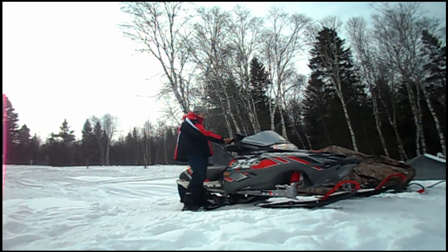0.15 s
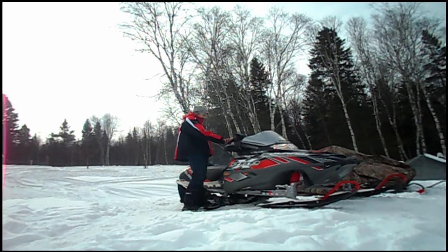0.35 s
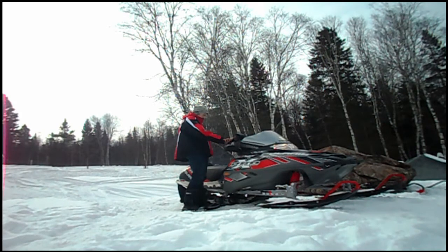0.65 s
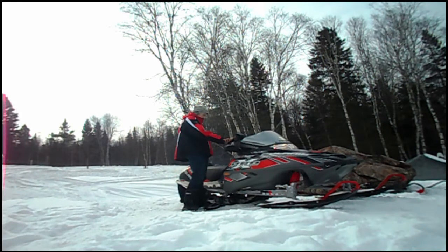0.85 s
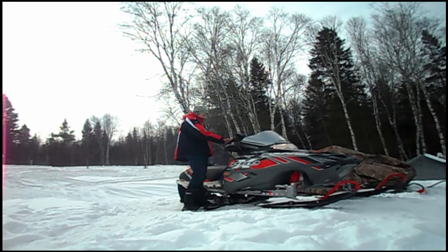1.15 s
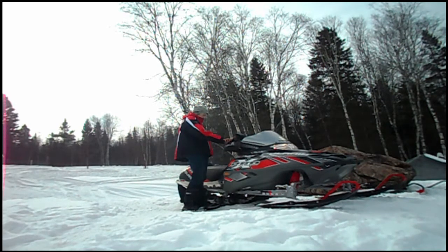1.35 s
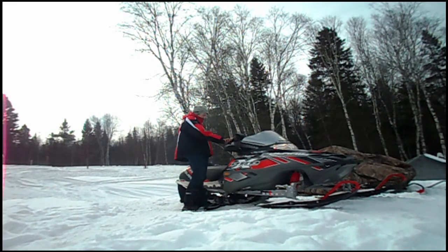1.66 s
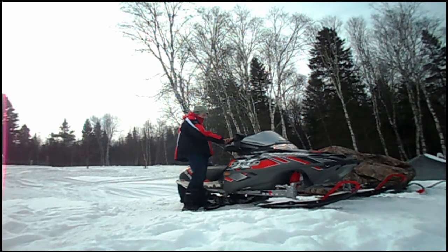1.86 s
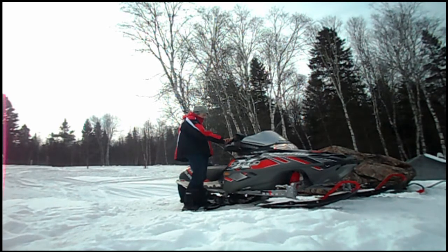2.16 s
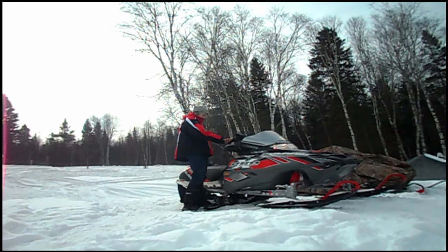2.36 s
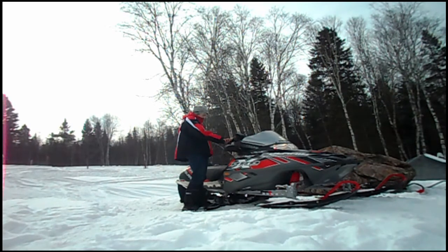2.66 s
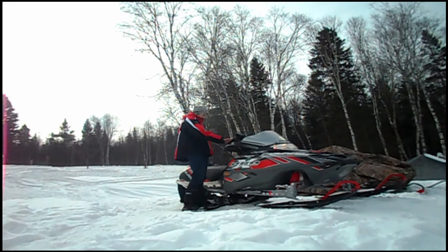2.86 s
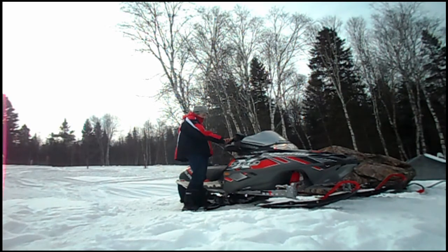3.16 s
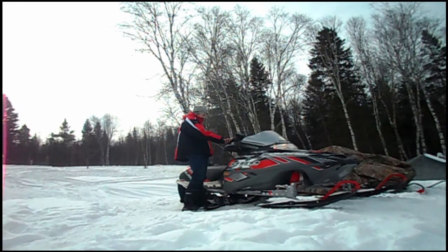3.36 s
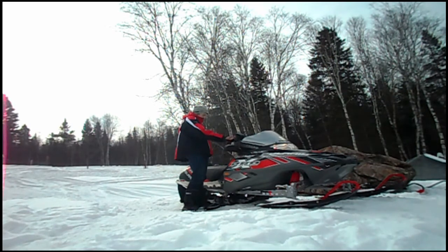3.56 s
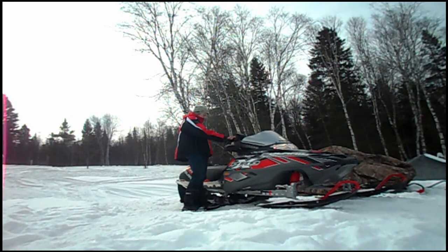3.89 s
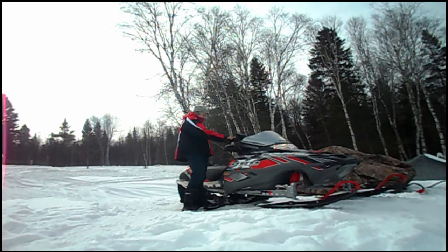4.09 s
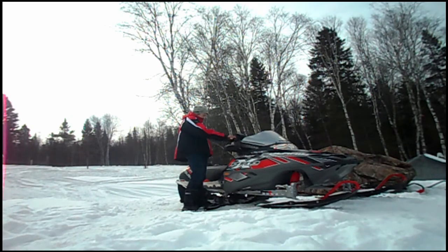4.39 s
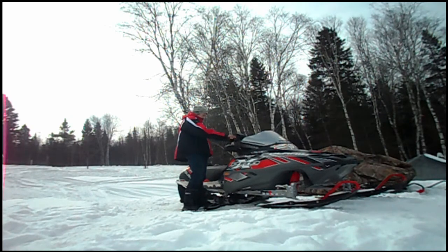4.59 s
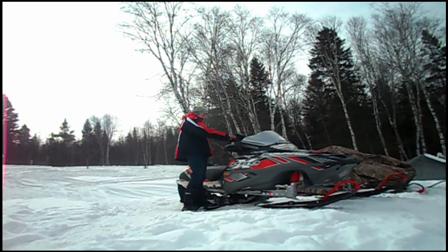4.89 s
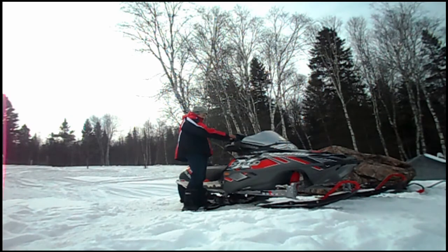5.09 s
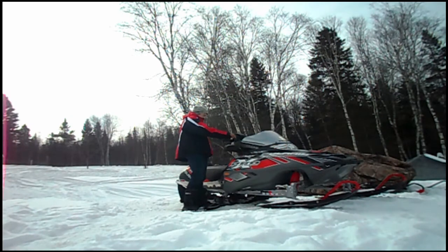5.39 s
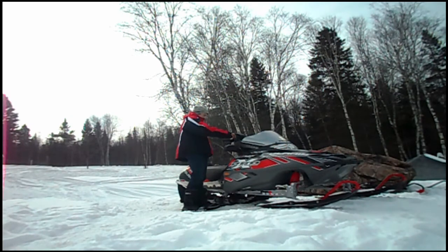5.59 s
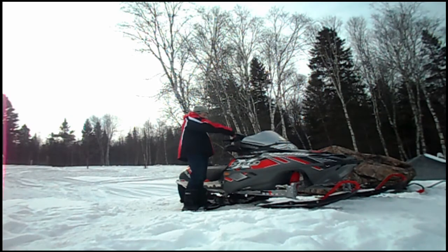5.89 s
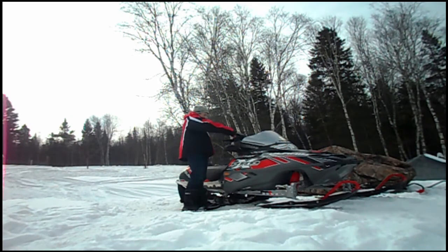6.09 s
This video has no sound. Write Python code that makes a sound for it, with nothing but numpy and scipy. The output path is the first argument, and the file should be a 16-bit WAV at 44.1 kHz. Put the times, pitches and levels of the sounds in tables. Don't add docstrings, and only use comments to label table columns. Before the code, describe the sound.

A twin-cylinder two-stroke snowmobile idles close by in an open snow field, lumpy and irregular, deep exhaust pops with short hiss over fast puttering and casing rattle. Just after four seconds it is shut off; the putter slows and sinks into separate soft clacks and puffs, then dull bumps. Faint wind and tiny distant bird whistles remain, picked up by a small camera microphone with slight hiss.

```python
import sys
import numpy as np
from scipy import signal
from scipy.fft import rfft, irfft, next_fast_len
from scipy.io import wavfile
from scipy.ndimage import uniform_filter1d, map_coordinates

SR = 44100
rng = np.random.default_rng(int(sys.argv[2]) if len(sys.argv) > 2 else 0)


def ratio_of_db(decibels):
    return 10 ** (np.asarray(decibels, float) / 20)


def to_wav(s):
    ch = np.atleast_2d(s).T
    pcm = np.round(np.clip(ch, -1, 1) * 32767)
    wavfile.write(sys.argv[1], SR, pcm.astype(np.int16))


N = 275178
T = np.arange(N) / SR

# (time [s], thump peak [dB], knock pitch [Hz])
LONE_CHARGES = [
    (0.1311, -16.5, 2600),
    (1.359, -13, 3180),
    (1.8931, -13.5, 3266),
    (2.1899, -18.7, 2570),
    (3.3377, -13, 3030),
    (3.8207, -11.5, 3235),
    (3.9968, -12.5, 3325),
    (4.2037, -13.5, 3180),
]
# (time [s], thump peak [dB], knock pitch [Hz], partner thump [dB])
PAIRED_CHARGES = [(0.0399, -14, 2810, -14.5), (0.3738, -11.5, 2565, -26), (0.4656, -12, 2890, -15.5),
                  (0.7036, -11, 3336, -16), (0.821, -13, 2990, -20), (0.8963, -16, 2610, -14.5),
                  (1.137, -9.5, 1870, -14.5), (1.462, -16.5, 2650, -15), (1.759, -15.5, 2610, -14),
                  (1.8488, -14.5, 2680, -22), (1.9968, -14.5, 2680, -14), (2.2787, -14.5, 3100, -18.5),
                  (2.6632, -11, 3270, -16.5), (2.7641, -13, 2610, -11.5), (2.8676, -17.5, 2544, -17),
                  (2.9569, -13, 3260, -20.5), (3.161, -13.5, 2770, -17.5), (3.2496, -15.5, 2540, -14),
                  (3.5618, -11, 2620, -15.5), (3.6983, -14, 2610, -14), (3.8952, -12.5, 1870, -15.5)]
# (time [s], thump peak [dB], knock pitch [Hz], partner thump [dB], partner knock [Hz])
STAGGERED_CHARGES = [(0.2072, -12, 2640, -12, 3270), (0.5858, -12, 3290, -19.5, 2495),
                     (0.9867, -13.5, 2660, -12, 2610), (1.2701, -13, 2764, -11, 2570),
                     (1.5209, -15, 2674, -13, 3060), (1.6399, -15, 2740, -11.5, 2604),
                     (2.1011, -12.5, 3050, -12, 1850), (2.3537, -14, 2640, -11.5, 3320),
                     (2.5014, -12.5, 2770, -14, 3236), (3.0284, -12, 1835, -14, 2570),
                     (3.4269, -12, 2870, -18.5, 2650), (4.0708, -12, 1800, -14.5, 2610)]
# (pitch [Hz], knock level [dB])
KNOCK_MODES = [(1850, -36.5), (2650, -37), (3050, -35.5), (3260, -33)]
# (frequency [Hz], level [dB])
JET_HISS = [(250, -28), (350, 3), (600, 6.5), (1500, 3), (3000, -0.5), (4500, -7), (6000, -7), (8000, -7),
            (10000, -2), (11500, -12.5), (13000, -18.5), (15700, -24.5)]
# (frequency [Hz], width [Hz], level [dB], delay [s])
HOT_PIPE = [(135, 20, -19, 0), (280, 14, -6.4, .0008)]
# (frequency [Hz], width [Hz], level [dB], delay [s])
COOL_PIPE = [(93, 27, -8, 0.003), (125.8, 39, -9.5, 0.0014), (168, 22, -7, 0.0015),
             (283.3, 23, -4.5, 0.0011)]
# (frequency [Hz], width [Hz], delay [s])
SILENCER = (49.4, 25.6, .0031)
# (time [s], port opening rate [Hz], compression effort [dB])
COAST = [
    (4.2, 76, -20),
    (4.271, 61.3, -26.5),
    (4.434, 57.4, -24.5),
    (4.636, 47, -28),
    (4.791, 38.3, -31),
    (5.018, 27, -32),
    (5.19, 23.3, -31.5),
    (5.288, 18.1, -32),
    (5.34, 17.6, -43),
]
# (multiple of crank speed, level [dB])
PUFF_ORDERS = [(1, -12), (2, 7.5), (3, -3.5), (4, 11), (5, -25), (6, 7), (7, -10), (8, 6.5), (9, -31),
               (10, 5), (11, -9.5), (12, -4.5), (14, -11), (16, -3.5)]
# (frequency [Hz], density [dB per Hz])
CLATTER_NOISE = [(190, 3.5), (330, -0.5), (378, -18), (563, -4.5), (631, -7.5), (740, -12), (898, -7),
                 (1090, -4.5), (1400, -8), (1760, -16.5), (2530, -11.5), (2900, -20), (5000, -28.5),
                 (6500, -83), (11000, -120)]
# (frequency [Hz], width [Hz], level [dB])
CASING_MODES = [(557, 39, -9), (783, 43, -2.5), (1075, 25, 2), (1166, 54, 0.5), (1336, 86, -6),
                (1870, 15, -8), (2037, 29, -1), (2340, 200, -11), (2610, 39, -4.5), (3050, 7.9, -0.5),
                (3297, 19, -2)]
# (frequency [Hz], level [dB])
INTAKE_BREATH = [(2000, -40), (3500, -3), (4100, -10), (5400, -10), (9700, -11), (11500, -21), (13000, -28),
                 (15600, -46)]
# (time [s], clack peak [dB])
LATE_STROKES = [(4.717, -40), (4.764, -35.5), (4.819, -34.5), (4.864, -38), (4.878, -37.5), (4.909, -40),
                (4.944, -39.5), (4.979, -43), (4.999, -40), (5.016, -44), (5.058, -41), (5.101, -46),
                (5.152, -44), (5.213, -47), (5.245, -45), (5.311, -66), (5.36, -45), (5.384, -45.5),
                (5.425, -51.5), (5.478, -48.5), (5.539, -50.5), (5.601, -55.5)]
# (time [s], level [dB])
LEAKS = [
    (4.765, -54),
    (4.864, -42.5),
    (4.979, -46),
    (4.999, -46),
    (5.502, -60),
    (5.524, -59),
]
# (frequency [Hz], width [Hz], level [dB])
CLACK_MODES = [(350, 300, -15), (750, 250, -14), (1180, 110, 0), (1350, 120, -7)]
# (frequency [Hz], width [Hz], level [dB])
CLUTCH_MODES = [(2037, 73, 0), (2680, 350, -1)]
# (frequency [Hz], level [dB])
LEAK_SIGH = [(4000, -10), (5000, -6), (6200, -7.5), (8000, -11), (10000, -9.5), (11500, -24), (15600, -40)]
# (time [s], peak [dB], ring [Hz], 60 dB decay [s])
BUMPS = [(5.384, -27, 47, 0.19), (5.476, -33.5, 187, 0.051), (5.486, -41, 294, 0.093),
         (5.48, -44, 470, 0.021), (5.484, -41.5, 785, 0.042), (5.359, -42, 335, 0.041),
         (5.375, -37.5, 150, 0.084), (5.5, -30, 41.7, 0.11), (5.591, -25.5, 87, 0.023),
         (5.63, -31, 40.2, 0.098), (5.736, -37, 29.7, 0.096), (5.779, -42, 60, 0.057),
         (6.076, -42, 45, 0.091), (6.105, -31, 50, 0.12)]
# (start [s], end [s], from pitch [Hz], to pitch [Hz], level [dB])
BIRDS = [(5.334, 5.37, 6900, 6950, -68), (5.365, 5.41, 9100, 9000, -74), (5.39, 5.42, 5650, 5600, -77),
         (5.416, 5.45, 6800, 8000, -73), (5.45, 5.56, 6500, 6500, -75), (5.6, 5.687, 6480, 6450, -72),
         (5.678, 5.69, 6300, 5000, -70), (5.72, 5.79, 6400, 7000, -75), (5.647, 5.75, 8450, 8500, -75),
         (5.74, 5.785, 8700, 8950, -77), (5.81, 5.873, 8750, 8400, -69), (5.87, 5.895, 9150, 9050, -69),
         (5.93, 6.024, 8750, 8650, -70), (6.09, 6.15, 8850, 8500, -71)]
# (frequency [Hz], level [dB])
AIR_NOISE = [(12, -35), (20, 8.5), (41, 4.5), (66, -15), (129, -20), (250, -23), (1000, -31), (3500, -38.5),
             (7000, -40), (10000, -36.5), (11500, -46), (15700, -42)]

IDLE_HZ = 67
USUAL_DB = -13
NEXT_PORT_S, THIRD_PORT_S = .0148, .0445
KICK_S_PER_DB = .00015
PARTNER_HZ = 2740
JET_DB, JET_GROWS = -38, 1
JET_SCATTER_DB, KNOCK_SCATTER_DB = 1.3, 1
UNEVEN_DB, HOT_UNEVEN_DB = 1.2, 2.2
RINGS_BELOW_HZ = 56
COOL_CAN_DB = 2
SPENT_SHARE = 0.14
REST_S, REST_DB = 0.37, -13
PUFF_DB = -15
BRIGHT_DB, CLUTCH_STOPS_S = -46, 5.18
DULL_DB = -24
TOP_HZ = 15750


def firings():
    s, db, knock_hz = charges()
    chance = rng.standard_normal((len(s), 2))
    jet_db = JET_DB + JET_GROWS * (db - USUAL_DB) + JET_SCATTER_DB * chance[:, 0]
    knock_db = np.interp(knock_hz, *np.transpose(KNOCK_MODES)) + KNOCK_SCATTER_DB * chance[:, 1]
    thump = filtered(ticks(s, ratio_of_db(db)), lambda f: exhaust(f, HOT_PIPE, can_db=-6.9, direct_db=37.8, soft_hz=285))
    spit = ratio_of_db(1.5 * wobble(500))
    jet = bursts(s - .0065, ratio_of_db(jet_db + 6.5), rise=0.0032, fall=0.014) * unit(spit * noise(JET_HISS))
    knock_s = s - .011
    latest = np.clip(np.searchsorted(knock_s, T) - 1, 0, None)
    rough_hz = knock_hz[latest] + 170 * wobble(500)
    ping = np.sin(2 * np.pi * np.cumsum(rough_hz) / SR)
    knock = bursts(knock_s, ratio_of_db(knock_db + 2), rise=.001, fall=.0055) * ping
    return thump + jet + knock


def charges():
    def after(gap, s, db):
        return s + gap - KICK_S_PER_DB * (db - USUAL_DB)

    rows = [*LONE_CHARGES, *(row[:3] for row in [*PAIRED_CHARGES, *STAGGERED_CHARGES])]
    for s, db, _, next_db in PAIRED_CHARGES:
        rows.append((after(NEXT_PORT_S, s, db), next_db, PARTNER_HZ))
    for s, db, _, next_db, next_hz in STAGGERED_CHARGES:
        rows.append((after(THIRD_PORT_S, s, db), next_db, next_hz))
    return np.transpose(sorted(tuple(row) for row in rows))


def exhaust(f, pipe, can_db, direct_db, soft_hz):
    c, w, lag = SILENCER
    can = ratio_of_db(can_db) * c * SR / np.pi / (c * c - f * f + 1j * f * w)
    can = can * np.exp(-2j * np.pi * f * lag)
    return (can - modes(f, pipe) - ratio_of_db(direct_db)) * np.exp(-(f / soft_hz) ** 4)


def crank():
    s = charges()[0]
    count = np.cumsum(np.round(np.diff(s, prepend=s[0]) * IDLE_HZ))
    idle = np.interp(T, s, count) + np.minimum(T - s[0], 0) * IDLE_HZ
    coast_s, coast_hz, _ = np.transpose(COAST)
    return idle + np.cumsum(np.interp(T, coast_s, coast_hz) * (T > s[-1])) / SR


def coasting(idle_db, coast_db):
    s = np.transpose(COAST)[0]
    rest_s = s[-1] + REST_S
    levels = [idle_db, *coast_db[1:], coast_db[-1] + REST_DB, -100]
    return ratio_of_db(np.interp(T, [*s, rest_s, rest_s + .08], levels))


def with_speed(full_db, db_per_octave):
    return full_db + db_per_octave * np.log2(np.transpose(COAST)[1] / IDLE_HZ)


def pumping(turns):
    hop = 64
    speed = uniform_filter1d(np.gradient(turns) * SR / 2, SR // 50)[::hop]
    slow = np.arange(N) // hop
    puffs, power = np.zeros(N), 0
    coasts = T[::hop] > COAST[0][0]
    uneven_db = np.where(coasts, UNEVEN_DB, HOT_UNEVEN_DB)
    rings = coasts * np.clip((IDLE_HZ - 2 * speed) / (IDLE_HZ - RINGS_BELOW_HZ), 0, 1)
    can_db = -0.5 + COOL_CAN_DB * rings
    for order, db in PUFF_ORDERS:
        pitch = order * speed
        answer = ratio_of_db(db) * exhaust(pitch, COOL_PIPE, can_db, direct_db=36.0, soft_hz=394)
        level, lag = np.abs(answer), rings * np.unwrap(np.angle(answer))
        level *= 1 / (1 + (43 / pitch) ** 4.5)
        power = power + level ** 2 / 2
        uneven = ratio_of_db(uneven_db * wobble(25)[::hop])
        puffs += (level * uneven)[slow] * np.sin(np.pi * order * turns + lag[slow])
    s = charges()[0]
    spent = 1 - SPENT_SHARE * bursts(s, np.ones(len(s)), rise=0.011, fall=0.025).clip(0, 1)
    return spent * coasting(-26.5, np.transpose(COAST)[2]) * puffs / np.sqrt(power[slow])


def clatter(turns):
    def beat(shift, sharp):
        return (.5 + .5 * np.cos(2 * np.pi * (turns - shift))) ** sharp

    blur = np.clip(np.gradient(turns) * SR / IDLE_HZ, .2, 1) ** 2
    slap = 1.1 * blur + beat(.25, 3) * ratio_of_db(2 * wobble(60))
    slap += .4 * beat(.75, 3) * ratio_of_db(2.5 * wobble(60))
    slap /= np.sqrt(np.abs(uniform_filter1d(slap ** 2, SR // 8)))
    rattle = unit(slap * (noise(CLATTER_NOISE) + 0.79 * resonant(CASING_MODES)))
    gusts = 3.4 + beat(0.77, 0.42) * ratio_of_db(4.8 * wobble(50))
    breath = unit(gusts * ratio_of_db(1.7 * wobble(370)) * noise(INTAKE_BREATH))
    rattle *= coasting(-34.0, with_speed(full_db=-31.5, db_per_octave=12.5))
    return rattle + coasting(-46, with_speed(full_db=-44.5, db_per_octave=13.0)) * breath


def last_strokes():
    s, db = np.transpose(LATE_STROKES)
    bright_db = np.where(s < CLUTCH_STOPS_S, BRIGHT_DB, db + DULL_DB) + rng.normal(0, 2.9, len(s))
    leak_s, leak_db = np.transpose([*LEAKS, *zip(s, db + PUFF_DB)])
    clack = bursts(s, ratio_of_db(db - 3.5), rise=.002, fall=.011) * resonant(CLACK_MODES)
    clutch = bursts(s, ratio_of_db(bright_db - 2.5), rise=0.001, fall=0.018) * resonant(CLUTCH_MODES)
    puff = bursts(leak_s, ratio_of_db(leak_db - 3.5), rise=0.0015, fall=0.017) * noise(LEAK_SIGH)
    bumps, t = np.zeros(N + SR), T[:SR // 4]
    for start, peak_db, hz, t60 in BUMPS:
        swell = 1 - np.exp(-t / 0.0014)
        ring = ratio_of_db(peak_db + 2 - 60 * t / t60) * np.sin(2 * np.pi * hz * t)
        bumps[round(start * SR):][:len(t)] -= ring * swell
    return clack + clutch + puff + bumps[:N]


def birds():
    out = np.zeros(N)
    for start, end, from_hz, to_hz, db in BIRDS:
        u = np.clip((T - start) / (end - start), 0, 1)
        pitch = from_hz + (to_hz - from_hz) * u + 50 * wobble(70)
        swell = np.sqrt(np.sin(np.pi * u).clip(0))
        out += ratio_of_db(db + 1.0 + 2.5 * wobble(90)) * swell * np.sin(2 * np.pi * np.cumsum(pitch) / SR)
    return out


def air():
    return ratio_of_db(-49.5 + 0.76 * wobble(5.4)) * noise(AIR_NOISE)


def unit(x):
    return x / np.sqrt(np.mean(x ** 2) + 1e-20)


def filtered(x, response):
    m = next_fast_len(N + SR // 2)
    return irfft(rfft(x, m) * response(np.fft.rfftfreq(m, 1 / SR)), m)[:N]


def noise(spectrum):
    hz, db = np.transpose(spectrum)

    def colour(f):
        return ratio_of_db(np.interp(np.log(f + 1), np.log(hz), db, -120, -120))

    return unit(filtered(rng.standard_normal(N), colour))


def resonant(table):
    def ring(f):
        total = sum(ratio_of_db(db) * f * w / (c * c - f * f + 1j * f * w) for c, w, db in table)
        return total * np.exp(-(f / 4200) ** 4)

    return unit(filtered(rng.standard_normal(N), ring))


def modes(f, table):
    total = 0
    for c, w, db, lag in table:
        ring = 1j * f * SR / np.pi / (c * c - f * f + 1j * f * w)
        total = total + ratio_of_db(db) * ring * np.exp(-2j * np.pi * f * lag)
    return total


def wobble(rate):
    return map_coordinates(rng.standard_normal(int(N * rate / SR) + 4), [T * rate], order=2)


def ticks(times, gains):
    at = np.clip(np.round(times * SR).astype(int), 0, N - 1)
    return np.bincount(at, gains, N)


def bursts(times, gains, rise, fall):
    t = T[:SR // 8]
    shape = (1 - np.exp(-t / rise)) ** 2 * np.exp(-t / fall)
    power = signal.fftconvolve(ticks(times, gains ** 2), (shape / shape.max()) ** 2)[:N]
    return np.sqrt(np.abs(power))


def scene():
    turns = crank()
    machine = firings() + pumping(turns) + clatter(turns) + last_strokes()
    return (machine + birds() + air())[None]


def low_pass(x):
    return signal.sosfilt(signal.butter(12, 15740, fs=SR, output="sos"), x)


def record(dry):
    heard = filtered(dry[0], lambda f: 1j * f / (13.5 + 1j * f) * (f < TOP_HZ))
    return low_pass(heard[None])


dry = scene()
out = record(dry)
to_wav(out)
```